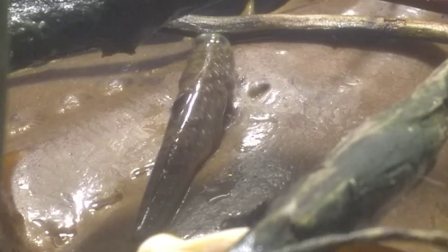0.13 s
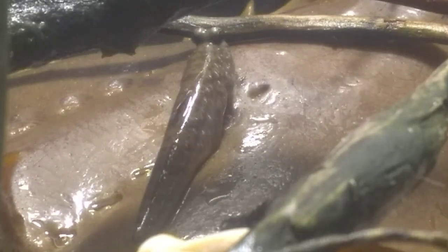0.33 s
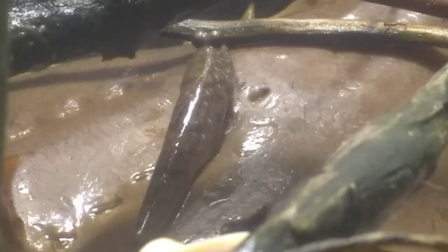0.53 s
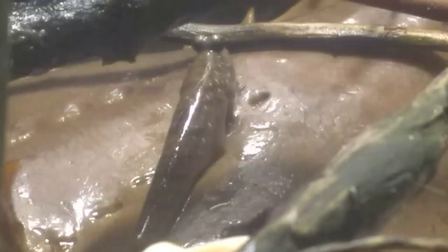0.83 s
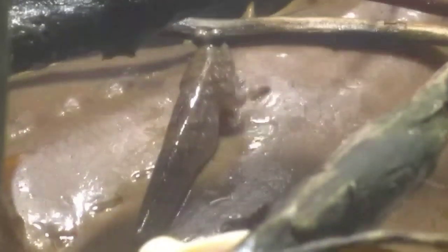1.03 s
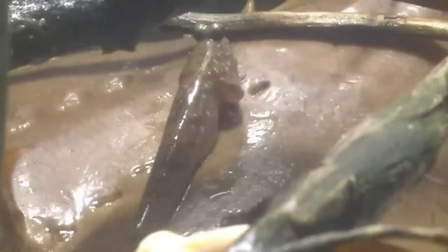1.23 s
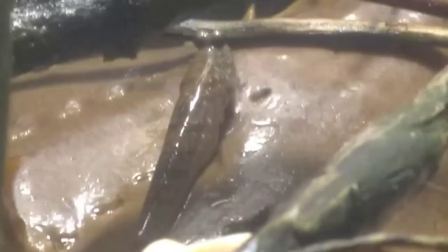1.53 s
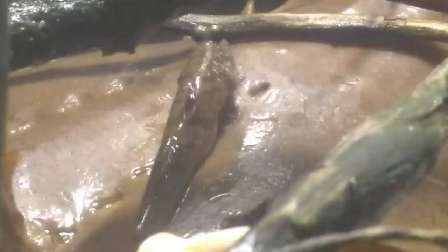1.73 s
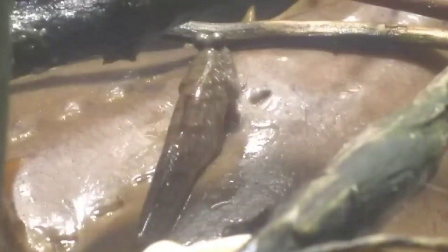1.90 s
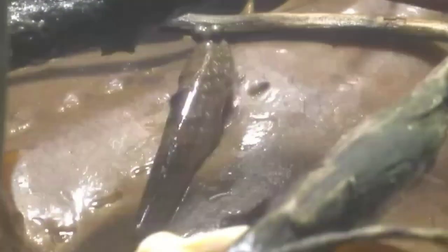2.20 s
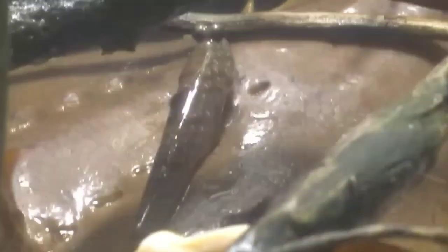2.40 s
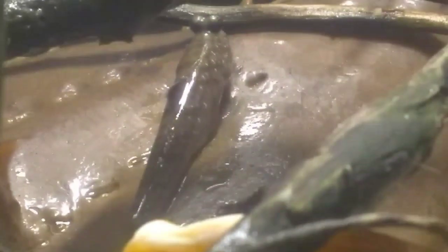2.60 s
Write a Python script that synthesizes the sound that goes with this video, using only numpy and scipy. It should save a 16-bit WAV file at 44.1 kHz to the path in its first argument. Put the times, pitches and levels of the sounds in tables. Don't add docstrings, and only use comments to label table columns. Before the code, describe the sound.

A steady low hum of pumps and a fan with room rumble, under a constant restless rush of filter water; light trickling and a few bubble blips, indoors, on a wide stereo camera microphone.

```python
import sys
import numpy as np
from scipy import signal
from scipy.fft import rfft, irfft
from scipy.io import wavfile
from scipy.ndimage import uniform_filter1d

SR = 44100
rng = np.random.default_rng(int(sys.argv[2]) if len(sys.argv) > 2 else 0)


def unload_audio(sound):
    columns = np.transpose(np.atleast_2d(sound))
    steps = np.round(np.clip(columns, -1, 1) * 32767)
    wavfile.write(sys.argv[1], SR, steps.astype(np.int16))


def gain_from_decibels(decibels):
    exponent = np.asarray(decibels, float) / 20
    return 10 ** exponent


N = 121275
T = np.arange(N) / SR
HZ = np.maximum(np.arange(N // 2 + 1) * SR / N, 1)
CROSS_LAG_S = .000489


def column(table, count):
    table = np.array(table, float)
    return np.interp(np.log(HZ), np.log(table[:, 0]), table[:, count])


def bell(hz, width_hz):
    return np.exp(-((HZ - hz) / width_hz) ** 2)


def level(x, db):
    return x * gain_from_decibels(db) / np.sqrt(np.mean(x ** 2))


def walk(rate_hz):
    hold = int(SR / rate_hz)
    steps = np.repeat(rng.standard_normal(N // hold + 1), hold)
    drift = uniform_filter1d(uniform_filter1d(steps, hold), hold)[:N]
    return (drift - drift.mean()) / drift.std()


def noise(count):
    return rfft(rng.standard_normal((count, N)))


def restless(spectra):
    shared_db, flicker_db = 0.06, 0.64
    out, shared = 0, walk(3.3)
    for hz in 2 ** np.arange(4.5, 14.6, .5):
        shared = (shared + walk(5.03)) / np.sqrt(2)
        band = np.cos(np.pi / 2 * np.clip(2 * np.log2(HZ / hz), -1, 1)) ** 2
        gain = gain_from_decibels(shared_db * shared + flicker_db * walk(14))
        out = out + irfft(spectra * band, N) * gain
    return out


def tones(hz, table):
    align_s, sway_rad, sway_db = 1.525, .03, .7
    turn = 2 * np.pi * hz * (T - align_s) + sway_rad * walk(1.71)
    out = 0
    for multiple, left_db, right_db, left_rad, right_rad in table:
        rms = gain_from_decibels(np.array([[left_db], [right_db]]) + sway_db * walk(2.62))
        phase = round(multiple) * turn + np.array([[left_rad], [right_rad]])
        out = out + np.sqrt(2) * rms * np.cos(phase)
    return out


def hum():
    # (multiple, left [dB], right [dB], left phase [rad], right phase [rad])
    pump = [(1, -45, -51, -.09, .19), (2, -45, -47.5, 4.53, 2.94), (18, -58, -59, 0, 0),
            (22, -66, -60, 0, 1), (45, -68, -73, 0, -1.1), (48, -66, -67, 0, 0)]
    mains = [(1, -68, -56.5, 3.8, 2.02), (2, -45.4, -41.3, 1.35, -1.28), (3, -74, -52, 0, .2),
             (5, -58, -61, 0, 0), (6, -58, -58, 0, 0), (7, -52.5, -66, 0, 0), (8, -57, -60, 0, 0)]
    fan = [(6, -51, -53, 0, 0), (11, -49, -50, 0, .25), (12, -53, -66, 0, 0), (18, -50, -52.5, 0, -.16),
           (22, -49.5, -57, 0, -.4)]
    twin = [(2, -52, -58, 6.21, 4.53)]
    machines = tones(58.26, pump) + tones(58.62, twin) + tones(24.848, fan)
    return machines + tones(60.02, mains)


def rumble():
    # (frequency [Hz], density [dB per Hz])
    balance = [(25, -31), (70, -14), (130, -11), (170, -3), (420, -3.5), (620, -3.5), (900, -7.5),
               (1800, -55.5)]
    # (frequency [Hz], width [Hz], gain [dB])
    booms = [(106, 34, 9.5), (173, 33, 4.5), (325.6, 4.1, -5.5), (346.4, 21, 4), (409, 49.6, 6.5),
             (575, 13, -0.5), (487, 21, -5), (82.5, 13, -4), (138, 8, -4), (184, 11, -4),
             (206.5, 9.4, -0.5), (373, 8.8, -5.5), (412, 5.2, -8.5), (592, 12, 3), (644, 66, -1.5),
             (715, 22, 2), (818, 7.4, 3.5), (873, 33, -9.5), (975, 18, 2.5), (795, 7.3, -4.5),
             (405, 11, -1.5)]
    # (frequency [Hz], left minus right [dB], unrelated share [0-1])
    spread = [(40, 18, 1), (133, -1, 0.63), (170, -2.5, 0.23), (306, 6.5, 0.13), (506, 2.5, 0.4),
              (800, 2, 0.39)]
    db = column(balance, count=1)
    for hz, width_hz, gain_db in booms:
        db = db + gain_db * bell(hz, width_hz)
    pan = column(spread, count=1) / 2
    own = np.clip(column(spread, count=2), 0, 1)
    n = noise(count=3)
    sides = np.sqrt(1 - own) * n[0] + np.sqrt(own) * n[1:]
    return level(restless(sides * gain_from_decibels(db + np.array([pan, -pan]))), -38.5)


def patchy_noise():
    patchy_db, per_s = 5.5, 28
    n, out = noise(count=2), 0
    for k in range(15):
        band = np.cos(np.pi / 2 * np.clip(2 * HZ * CROSS_LAG_S - k, -1, 1)) ** 2
        gain = gain_from_decibels(patchy_db * np.array([walk(per_s), walk(per_s)]))
        out = out + irfft(n * band, N) * gain
    return rfft(level(out, -1.5))


def widened(colour):
    # (frequency [Hz], share from the left [0-1], unrelated share [0-1], left minus right [dB])
    spread = [(1000, .85, .04, .3), (1800, .85, .08, -.4), (2600, .5, .1, .1), (3600, .25, .015, -.3),
              (4800, .36, .02, -.6), (6000, .28, .06, -.8), (8000, .33, .2, -2.5), (13000, .4, .45, -2.2)]
    # (frequency [Hz], width [Hz], centre [dB], sides [dB])
    rings = [(1650, 123, -2, -2), (2100, 150, 0, -3.5), (2465, 140, 2.5, -1), (2720, 160, -0.5, 5),
             (3390, 230, -1, 4.5), (3944, 63, -14, -4.5), (4980, 360, -2, -2), (5810, 140, 4, -4),
             (6460, 150, -2.5, 3), (7100, 300, 1, 2), (8100, 330, 0, -2.5), (12500, 500, -1, 1),
             (13400, 500, 0, 5), (5050, 230, -0.5, -2), (5890, 91, -3, -1), (4160, 61, 0, 0),
             (10700, 150, 0, -2)]
    from_left = np.clip(column(spread, count=1), 0, 1)
    own = np.clip(column(spread, count=2), 0, 1)
    pan = column(spread, count=3) / 2
    n = noise(count=2)
    a, b = np.sqrt(from_left) * n[0], np.sqrt(1 - from_left) * n[1]
    cross = -np.exp(-2j * np.pi * HZ * CROSS_LAG_S)
    combed = np.array([(a + b) * (1 + cross), (a - b) * (1 - cross)]) / 2
    both = np.sqrt(1 - own) * combed + np.sqrt(own / 2) * patchy_noise()
    db = 0
    for hz, width_hz, centre_db, sides_db in rings:
        db = db + np.array([[centre_db], [sides_db]]) * bell(hz, width_hz)
    mid, side = both * gain_from_decibels(db)
    return np.array([mid + side, mid - side]) * colour * gain_from_decibels(np.array([pan, -pan]))


def rush():
    # (frequency [Hz], density [dB per Hz])
    balance = [(500, -19), (950, -0.57), (1450, -0.47), (2000, -8.5), (2900, -12), (4600, -21.5),
               (8000, -33), (14500, -50.5)]
    return level(restless(widened(gain_from_decibels(column(balance, count=1)))), -40.5)


def trickle():
    patchy_db = 3.5
    ring = irfft(widened(bell(3940, 170)), N)
    patches = walk(45.24) + 0.3 * walk(6.4)
    return level(ring * gain_from_decibels(patchy_db * patches), -59)


def insect():
    # (start [s], length [s], level [dB])
    chirps = [
        (.08, .26, -90),
        (.545, .035, -92),
        (.865, .035, -92),
        (1.185, .03, -95),
        (1.505, .035, -92),
        (1.83, .25, -94),
        (2.14, .035, -92),
        (2.455, .035, -94),
    ]
    note_hz, width_hz, pan_db, edge_s = 14003, 90, -26, .008
    note = level(np.sin(2 * np.pi * note_hz * T + .6 * walk(width_hz)), 0)
    gate = 0
    for start, length, db in chirps:
        inside = np.minimum(T - start, start + length - T)
        gate = gate + gain_from_decibels(db) * np.clip(inside / edge_s, 0, 1)
    pan = gain_from_decibels(np.array([[pan_db], [-pan_db]]) / 2)
    return note * gate * pan * np.array([[1], [-1]])


def bubbles():
    # (start [s], pitch [Hz], level [dB])
    blips = [(.382, 2840, -46), (0.581, 2890, -46), (1.011, 3050, -48), (1.867, 2980, -53),
             (2.472, 2580, -47), (.671, 7000, -68), (2.012, 6940, -66), (2.266, 7060, -68),
             (2.66, 7400, -59), (1.052, 2950, -49), (1.168, 2300, -50), (1.257, 3030, -39.5),
             (1.404, 2930, -39)]
    t60_s, rise_s = 0.065, 0.002
    out = np.zeros(N)
    for start, hz, db in blips:
        t = np.maximum(T - start, 0)
        envelope = gain_from_decibels(db - 60 * t / t60_s) * (1 - np.exp(-t / rise_s))
        out += envelope * np.sin(2 * np.pi * hz * t)
    return out


def scene():
    return hum() + rumble() + rush() + trickle() + insect() + bubbles()


def top_cut(x):
    return signal.sosfilt(signal.butter(12, 14250, fs=SR, output="sos"), x)


def record(dry):
    # (time [s], gain [dB])
    fade = [(.077, -25), (0.088, -17.5), (0.112, -10.5), (.2, -4.5), (.29, -0.5), (.33, 0)]
    fade = np.array(fade)
    bass_cut_hz, cut_ends_s, lift_s, bass_leak = 190, .255, .025, 0.23
    high_pass = signal.butter(1, bass_cut_hz, "high", fs=SR, output="sos")
    thin = signal.sosfilt(high_pass, dry)
    lift = np.clip((T - cut_ends_s) / lift_s, bass_leak, 1)
    gain = gain_from_decibels(np.interp(T, fade[:, 0], fade[:, 1])) * (T > fade[0, 0])
    return top_cut((thin + lift * (dry - thin)) * gain)


dry = scene()
out = record(dry)
unload_audio(out)
```